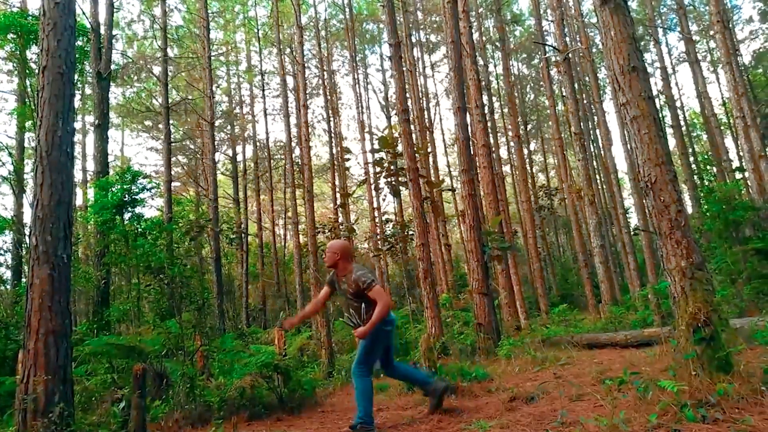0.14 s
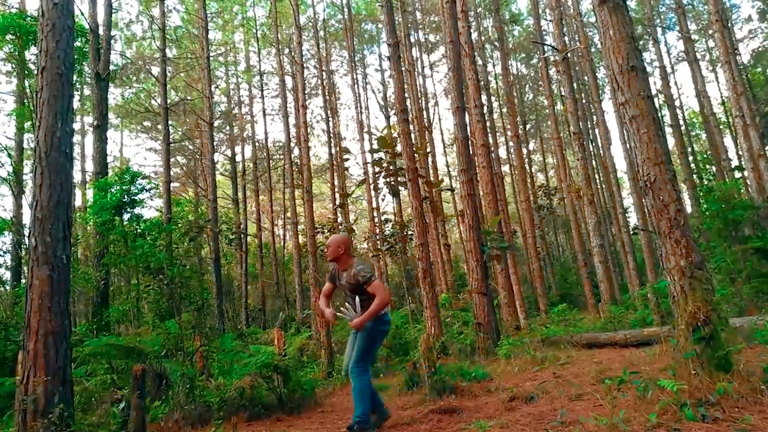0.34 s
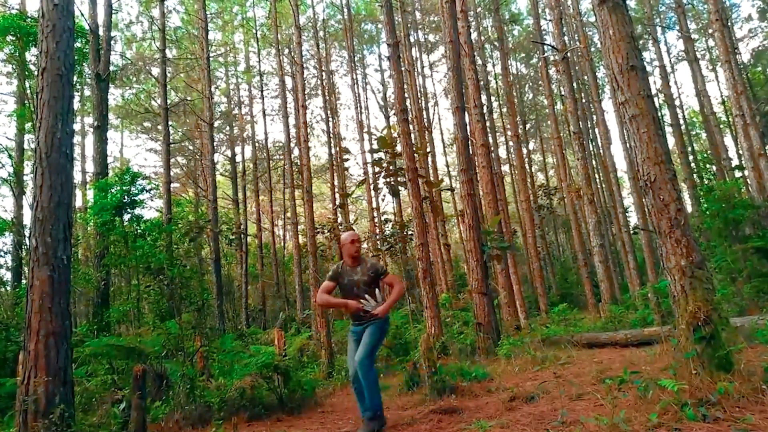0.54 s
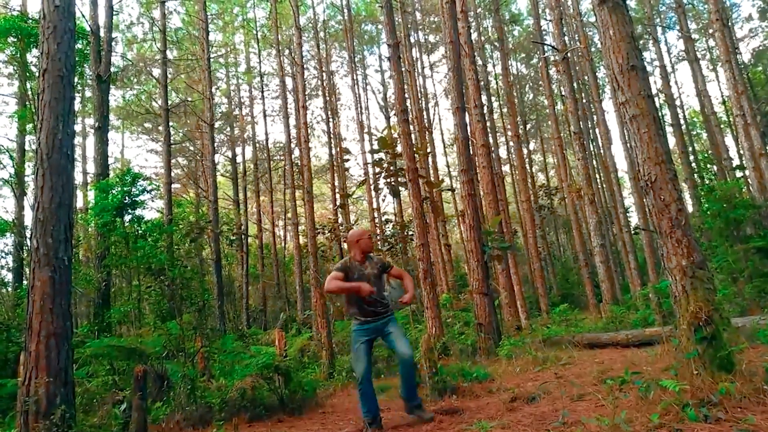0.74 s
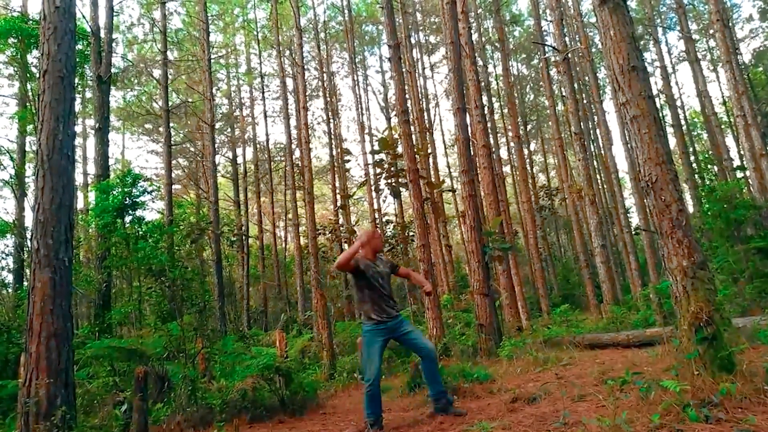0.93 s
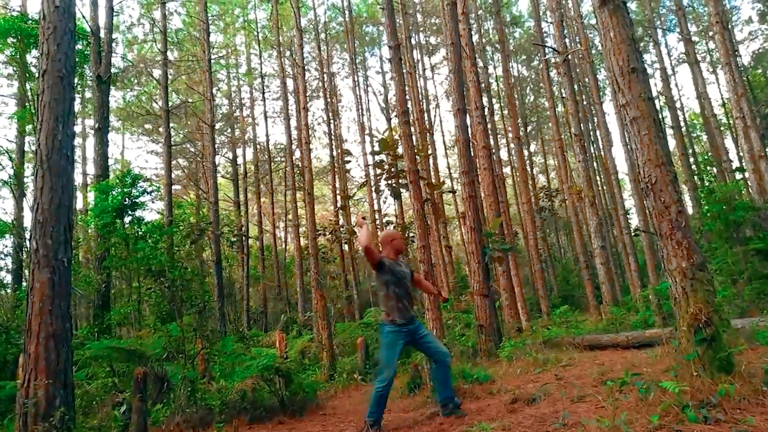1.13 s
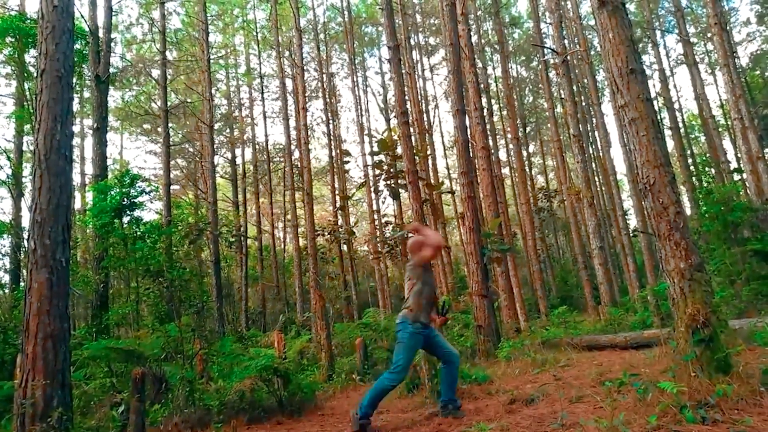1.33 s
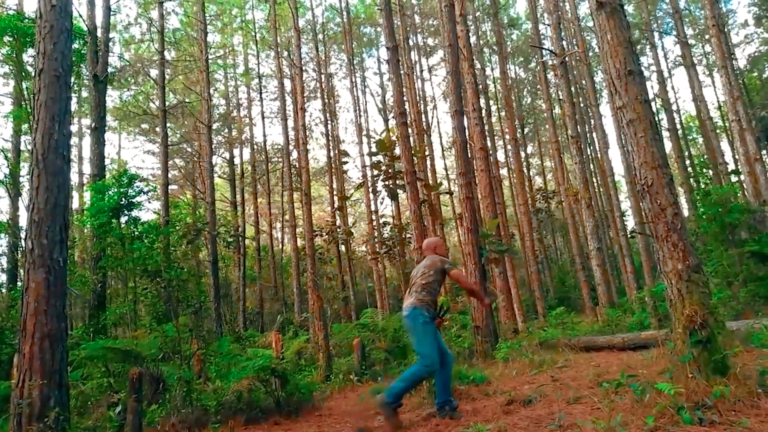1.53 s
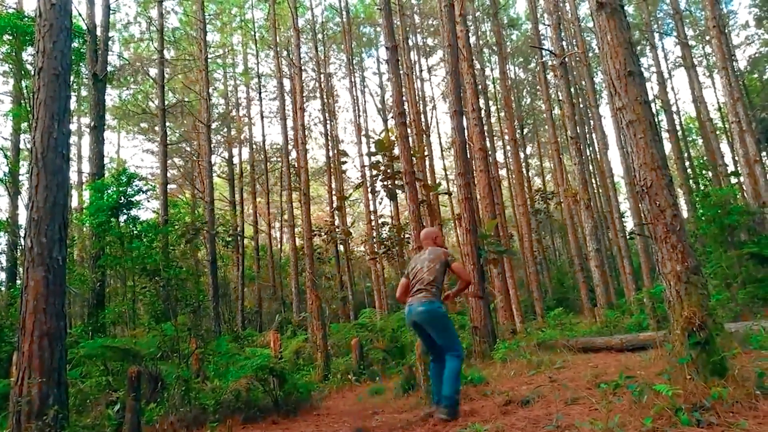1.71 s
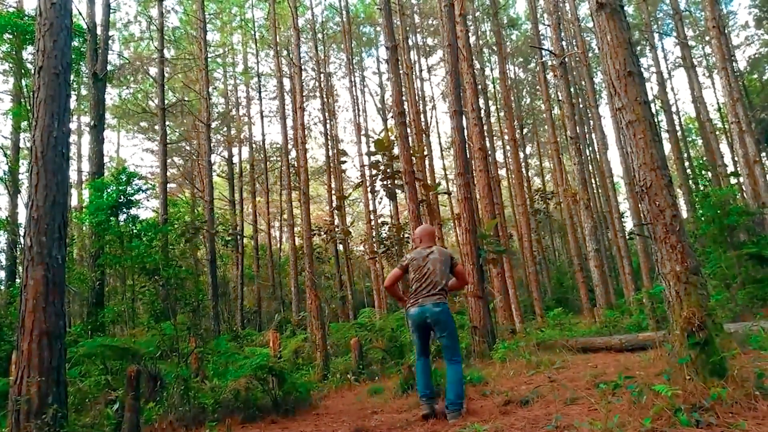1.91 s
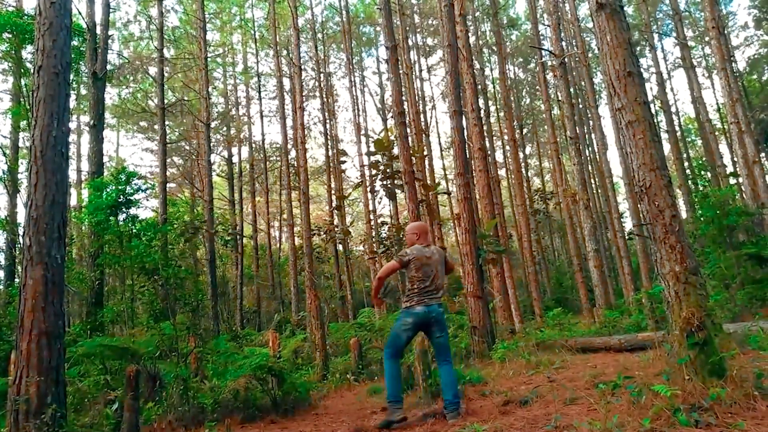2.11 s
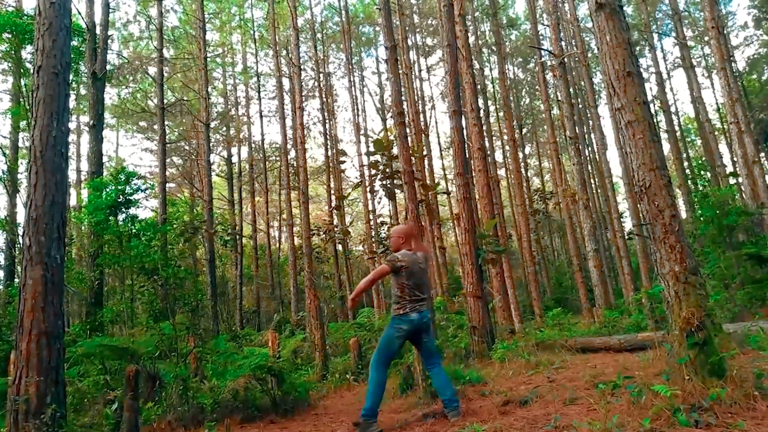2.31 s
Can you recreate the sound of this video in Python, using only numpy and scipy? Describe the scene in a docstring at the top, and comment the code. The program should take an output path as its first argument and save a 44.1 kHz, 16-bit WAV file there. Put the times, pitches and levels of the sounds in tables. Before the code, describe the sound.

Two throwing knives thunk hard into a wooden target, spare blades clinking between, in a quiet forest

```python
"""Two throwing knives slam into a wooden target close to the microphone and overload it: noise bursts for
crack and bite, damped modes for blade and wood. Pine trunks, ground and a diffuse tail scatter each blow back.
After each throw spare knives slide in the thrower's hand (grainy noise); after the first they also clink
(clicks and steel modes). Footsteps and swishes before the blows are crackly rustles over duller noise.
Behind it lie a low rumble and a thin hiss of insects, both slowly drifting noise."""
import sys
import numpy as np
from scipy import signal
from scipy.fft import rfft, irfft, next_fast_len
from scipy.io import wavfile
from scipy.ndimage import map_coordinates

SR = 44100
rng = np.random.default_rng(int(sys.argv[2]) if len(sys.argv) > 2 else 0)


def materialize(psi):
    """Save the field psi as 16-bit PCM at rate SR to the path in sys.argv[1].

    A 1-D psi becomes a single channel; in a 2-D psi each row is a channel.
    """
    bounded = np.clip(np.atleast_2d(psi).T, -1, 1)
    quanta = np.round(bounded * 32767).astype(np.int16)
    wavfile.write(sys.argv[1], SR, quanta)


N = 103635

# background spectra, relative: f/Hz, level/dB
RUMBLE_SPECTRUM = [(20, -35), (40, -15), (58, 0), (90, -1), (125, -8.5), (165, -18.5), (320, -20),
                   (600, -26.5), (1500, -34.5), (4000, -48)]
HISS_SPECTRUM = [(500, -21), (2000, -8), (5200, -11.5), (6300, -6.5), (7200, 1), (8300, -7), (8850, 4.5),
                 (9400, -11.5), (12000, -6), (13000, -25.5), (16000, -33)]
# rustles of feet and swishes: t/s, rustle level/dB, dull level/dB, dull f/Hz, rise/s, t60/s
RUSTLES = [(0.0, -50, -54, 447, 0.0017, 0.24), (0.115, -45, -51.5, 789.4, .012, 0.28),
           (0.148, -42.5, -53.5, 1390, .04, 0.27), (0.465, -61.5, -43, 414, 0.018, 0.098),
           (0.49, -46, -59.5, 427, 0.023, 0.13), (1.309, -57, -65.5, 407.4, 0.024, .25),
           (1.454, -46.5, -49.5, 940, .028, 0.23), (1.459, -50, -47.5, 2484, .025, .25),
           (1.51, -45, -51, 1264, 0.05, .2), (1.8, -39, -56, 512, 0.038, .2)]
# rustle spectrum, relative: f/Hz, level/dB
RUSTLE_SPECTRUM = [(200, -7), (700, -11.5), (2200, -7.5), (3300, -8), (7000, -4), (10000, -11.5),
                   (15500, -16.5)]
# spare knives rubbing: t/s, scrape level/dB, squeal level/dB, rise/s, t60/s
KNIFE_SLIDES = [(0.739, -28, -38.5, 0.01, 0.5), (0.77, -29.5, -36, .02, 0.083),
                (2.026, -55.5, -42, 0.0085, 0.208), (2.049, -55, -36.5, 0.006, 0.13)]
# spare knives clinking: t/s, level/dB
KNIFE_CLINKS = [(0.755, -25), (0.771, -23), (0.774, -22), (0.7908, -25), (0.794, -20), (0.811, -28.5)]
# scrape and click spectra, relative: f/Hz, level/dB
SCRAPE_SPECTRUM = [(500, -44), (1500, -21.5), (3300, -17), (4500, -7.5), (7200, 3.5), (9000, -6),
                   (12000, -12), (15500, -17)]
CLICK_SPECTRUM = [(700, -30.5), (1400, -19.5), (2300, 2), (3300, -20), (4300, -1), (7200, 2), (11500, -5),
                  (15500, -0.5)]
# loose blade modes before random spread: f/Hz, level/dB, t60/s
STEEL_MODES = [(2362, -9.5, .04), (4500, -15.5, .08), (5550, -11.5, 0.22), (5926, -5, 0.11),
               (6350, -13, 0.12), (6780, -5, 0.11), (7220, -3, 0.18), (8060, -8.5, .17), (8400, -6, 0.17),
               (10110, -7.5, 0.22), (10300, -12.5, 0.14), (11400, -14, 0.21), (13000, -4.5, .13)]
# forest decay: f/Hz, t60/s
FOREST_DECAY = [(100, .25), (220, .33), (500, 0.31), (1200, 0.75), (2400, 0.61), (6000, 0.57),
                (10000, 0.61), (15000, 0.45)]
# forest colour: f/Hz, gain/dB
FOREST_GAIN = [(60, -23), (130, -2), (220, 4.5), (380, 1), (700, -10), (1000, -10), (1300, -11.5),
               (1700, -7), (2300, -6), (2900, -8.5), (3800, -4.5), (5000, -8.5), (8000, -9.5),
               (11000, -12.5), (16000, -23)]
# knife strikes: t/s, crack level/dB, bite f/Hz, bite level/dB, wood level/dB, thud level/dB,
# blade f/Hz, blade level/dB, twin mode f/Hz, twin mode level/dB, blade t60/s, overtone f/Hz,
# overtone level/dB, slap delay/s, slap level/dB (re wood), left lead/ms (body only), forest level/dB
STRIKES = [(0.2058, 2.5, 6110, 2, 3, -9, 1212, 2.5, 1300, 1, 0.031, 2456, 3.5, 0.013, -21.5, 0.28, -8.5),
           (1.5516, -2, 5550, -5, -6.5, -9, 1025, -16.5, 1074, -20, .09, 2275, -7, .022, -7, -0.16, -2.5)]
# crack and slap grit spectra, relative: f/Hz, level/dB
CRACK_SPECTRUM = [(100, -15), (600, -13), (1500, 1), (3000, -3.5), (6500, -3.5), (9500, -8), (16000, -3)]
GRIT_SPECTRUM = [(500, -19), (2200, 1), (5800, -2), (9000, -19)]
# target's wood modes: f/Hz, level/dB, t60/s
WOOD_MODES = [(1370, -3.5, 0.0086), (2100, -9.5, 0.023), (2508, -7, 0.017), (3990, -4, 0.0099),
              (4320, -4.5, .007), (5450, -10, .006), (7680, -11, 0.02)]
# whole target flexing, before the radiation band: f/Hz, level/dB, t60/s
FLEX_MODES = [(165, -4.5, 0.0073), (218.5, -10.5, .1), (300, -2, 0.012), (378, -8.5, 0.017)]
# diffuse sound: f/Hz, left-right correlation/1
PORT_CORRELATION = [(60, .93), (250, .88), (450, 0.51), (800, 0.2), (1300, 0.41), (2500, -0.1)]
# port colour: f/Hz, left over right/dB
PORT_BALANCE = [(200, -1.5), (1200, 1), (2300, -7), (3200, -0.5), (5600, -8), (7200, -5), (8300, 3.5),
                (9500, 8), (11000, -4), (15000, 5)]

RUMBLE_DB, HISS_DB = -52.5, -58.5
SQUEAL_HZ, SQUEAL_WIDTH_RATIO, SQUEAL_GRAIN_DB = 7200, 1.5, 1
CLICK_T60_S, RING_DB, RING_SHIMMER, HAND_FOREST_DB = 0.029, -8, 0.7, -9.5
BASS_RETURN_S, BASS_HZ = 0.016, 434
NEAR_DB, NEAR_T60_S = 2.5, 0.08  # level re tail
TRUNK_DB, TRUNK_FADE_DB_PER_S = -12, 110  # level re tail
CRACK_T60_S, SPLINTER_DB, SPLINTER_T60_S = 0.0099, -24, 0.02  # splinter re crack
BITE_WIDTH_RATIO, BITE_T60_S = 1.59, 0.015
BLADE_DELAY_S, FLEX_RISE_S, OVERTONE_T60_S = 0.001, 0.00048, 0.014
THUD_DELAY_S, THUD_LOW_HZ, THUD_HIGH_HZ = 0.0013, 107, 430
SLAP_RISE_S, SLAP_T60_S, SLAP_GRIT_DB = 0.0026, 0.073, -10
CLIP_LEVEL, TOP_HZ = 1.0, 15950


def amp(db):
    """Decibels to gain."""
    return 10 ** (np.asarray(db) / 20)


def unit(x):
    """Scale to rms 1."""
    return x / np.sqrt(np.mean(x ** 2) + 1e-20)


def along(points, hz):
    """Interpolate (Hz, value) points on a log-frequency axis."""
    f, v = np.transpose(points)
    return np.interp(np.log(hz + 1), np.log(f + 1), v)


def filtered(x, response):
    """Apply a frequency response to x through the FFT."""
    m = next_fast_len(N + SR // 2)
    gain = response(np.fft.rfftfreq(m, 1 / SR))
    return irfft(rfft(x, m) * gain, m)[..., :N]


def wobble(knots_per_s):
    """Smooth random curve through normally distributed knots."""
    knots = rng.standard_normal(int(N * knots_per_s / SR) + 4)
    return map_coordinates(knots, [np.arange(N) * knots_per_s / SR])


def noise(spectrum):
    """Diffuse stereo noise of rms 1 whose left-right correlation depends on frequency."""
    def mid_side_gain(hz):
        angle = np.arccos(np.clip(along(PORT_CORRELATION, hz), -1, 1)) / 2
        return amp(along(spectrum, hz)) * [np.cos(angle), np.sin(angle)]

    mid, side = filtered(rng.standard_normal((2, N)), mid_side_gain)
    return unit(np.array([mid + side, mid - side]))


def band(hz, width):
    """Noise gathered round hz, 20 dB down at width times above and below it."""
    return noise([(hz / 8, -60), (hz / width, -20), (hz, 0), (hz * width, -20), (hz * 8, -60)])


def envelope(start_s, rise_s, t60_s):
    """Linear rise from start_s, then exponential fall."""
    t = np.arange(N) / SR - start_s
    fall = np.exp(-np.log(1000) * np.maximum(t - rise_s, 0) / t60_s)
    return np.clip(t / rise_s, 0, 1) * fall


def ring(modes, start_s, rise_s=0.00037):
    """Sum of damped sine modes struck at start_s."""
    t = np.arange(N) / SR - start_s
    return sum(amp(db) * envelope(start_s, rise_s, t60) * np.sin(2 * np.pi * hz * t)
               for hz, db, t60 in modes)


def background():
    """Low outdoor rumble and far insects: shaped noise, each drifting in level."""
    rumble = amp(RUMBLE_DB + 1.2 * wobble(2.6)) * noise(RUMBLE_SPECTRUM)
    hiss = amp(HISS_DB + 0.8 * wobble(5.3)) * noise(HISS_SPECTRUM)
    return rumble + hiss


def rustles():
    """Each row is a crackly rustle over a duller noise."""
    out = np.zeros((2, N))
    for start_s, rustle_db, dull_db, dull_hz, rise_s, t60_s in RUSTLES:
        rustle = unit(noise(RUSTLE_SPECTRUM) * amp(3.5 * wobble(500)))
        dull = noise([(dull_hz / 8, -40), (dull_hz / 2, -18), (dull_hz, 0),
                      (dull_hz * 2, -20), (dull_hz * 8, -60)])
        both = amp(rustle_db) * rustle + amp(dull_db) * dull
        out += envelope(start_s, rise_s, t60_s) * both
    return out


def diffuse_tail():
    """Noise decaying at a rate set by frequency; its bass builds up along a squared ramp."""
    hz, t, z = signal.stft(noise([(100, 0.016), (1000, 0)]), SR, nperseg=256)
    decay = np.exp(-np.log(1000) * t / along(FOREST_DECAY, hz)[:, None])
    tail = signal.istft(z * decay, SR, nperseg=256)[1][:, :N]
    bass = filtered(tail, lambda hz: 1 / (1 + (hz / BASS_HZ) ** 4))
    age_s = np.arange(N) / SR
    upper = (tail - bass) * np.clip(age_s / 0.017, 0, 1)
    bass = bass * np.clip(age_s / BASS_RETURN_S, 0, 1) ** 2
    return (upper + bass) * amp(0.94 * wobble(90))


def trunk_echoes(count):
    """Single trunk echoes at random delays, fading with delay and thinned in the bass."""
    echoes = np.zeros((2, N))
    delays_s = rng.uniform(0.017, 0.37, count)
    offsets_s = rng.uniform(-0.0002, 0.00048, count)
    for delay_s, offset_s, size in zip(delays_s, offsets_s, rng.normal(size=count)):
        gain = size * amp(-TRUNK_FADE_DB_PER_S * delay_s)
        echoes[0, int((delay_s + offset_s) * SR)] += gain
        echoes[1, int((delay_s - offset_s) * SR)] += gain
    return filtered(echoes, lambda hz: hz / (hz + 700))


def forest(x, trunk_count=50):
    """Convolve x with scatter from the ground nearby, trunk echoes and a diffuse tail."""
    tail = diffuse_tail()
    near = noise([(150, -25.5), (900, 3.5), (9000, -2)]) * envelope(0.0022, 0.003, NEAR_T60_S)
    trunks = trunk_echoes(trunk_count)
    answer = unit(tail) + amp(NEAR_DB) * unit(near) + amp(TRUNK_DB) * unit(trunks)
    answer = filtered(answer / np.sqrt(N), lambda hz: amp(along(FOREST_GAIN, hz)))
    return signal.fftconvolve(x, answer, axes=1)[:, :N]


def knife_slides():
    """Steel slides over steel: grainy scrape and a narrow squeal."""
    scrape = noise(SCRAPE_SPECTRUM) * amp(1.5 * wobble(400))
    squeal = unit(band(SQUEAL_HZ, SQUEAL_WIDTH_RATIO) * amp(SQUEAL_GRAIN_DB * wobble(300)))
    return sum((amp(scrape_db) * scrape + amp(squeal_db) * squeal) * envelope(start_s, rise_s, t60_s)
               for start_s, scrape_db, squeal_db, rise_s, t60_s in KNIFE_SLIDES)


def loose_blade_ring():
    """Clinks ring the loose blades at one port, unevenly because they touch."""
    out = np.zeros(N)
    for start_s, db in KNIFE_CLINKS:
        modes = [(hz * rng.normal(1, 0.00615), level_db + rng.normal(0, 1.8), t60_s)
                 for hz, level_db, t60_s in STEEL_MODES]
        out += amp(db + RING_DB) * ring(modes, start_s)
    return out * (1 + RING_SHIMMER * wobble(200))


def spare_knives():
    """Slides, clicks and blade rings, heard directly and by way of the forest."""
    clicks = noise(CLICK_SPECTRUM) * sum(amp(db) * envelope(start_s, 0.0005, CLICK_T60_S)
                                         for start_s, db in KNIFE_CLINKS)
    rings = np.array([loose_blade_ring() for port in range(2)])
    steel = knife_slides() + clicks + rings
    return steel + amp(HAND_FOREST_DB) * forest(steel)


def blow(start_s, crack_db, bite_hz, bite_db, wood_db, thud_db, blade_hz, blade_db, twin_hz, twin_db,
         blade_t60_s, over_hz, over_db, slap_delay_s, slap_db, lead_ms):
    """Point cracks and bites the wood, target flexes, stuck blade rings in close modes and slaps once."""
    splinter = amp(SPLINTER_DB) * envelope(start_s, 0.001, SPLINTER_T60_S)
    crack = noise(CRACK_SPECTRUM) * (envelope(start_s, 0.0004, CRACK_T60_S) + splinter)
    bite = band(bite_hz, BITE_WIDTH_RATIO) * envelope(start_s, 0.0007, BITE_T60_S)

    blade_modes = [(blade_hz, blade_db, blade_t60_s), (twin_hz, twin_db, blade_t60_s),
                   (over_hz, over_db, OVERTONE_T60_S)]
    blade = ring(blade_modes, start_s + BLADE_DELAY_S, FLEX_RISE_S)
    radiation = signal.butter(2, [THUD_LOW_HZ, THUD_HIGH_HZ], "bandpass", fs=SR, output="sos")
    thud = signal.sosfilt(radiation, ring(FLEX_MODES, start_s + THUD_DELAY_S, FLEX_RISE_S))

    slap_s = start_s + slap_delay_s
    grit = noise(GRIT_SPECTRUM) * envelope(slap_s, SLAP_RISE_S, SLAP_T60_S)
    slap = ring(WOOD_MODES, slap_s, SLAP_RISE_S) + amp(SLAP_GRIT_DB) * grit
    wood = ring(WOOD_MODES, start_s) + amp(slap_db) * slap

    body = blade + amp(thud_db) * thud + amp(wood_db) * wood
    # half the lead advances the left port, half delays the right
    half_lead_s = lead_ms / 1000 / 2 * np.array([[1], [-1]])
    body = filtered(body, lambda hz: np.exp(2j * np.pi * hz * half_lead_s))
    return amp(crack_db) * crack + amp(bite_db) * bite + body


def throws(directions=3):
    """Each blow arrives directly and via the forest from several directions, a little different in each."""
    out = np.zeros((2, N))
    for *strike, forest_db in STRIKES:
        direct = blow(*strike)
        scattered = sum(forest(blow(*strike)) for direction in range(directions))
        out += direct + amp(forest_db) * scattered / np.sqrt(directions)
    return out


def scene():
    """All sources at the two microphone ports."""
    return background() + rustles() + spare_knives() + throws()


def record(dry):
    """Colour each port, clip what exceeds the limit, then cut everything from TOP_HZ up."""
    x = filtered(dry, lambda hz: amp(along(PORT_BALANCE, hz) * np.array([[0.5], [-0.5]])))
    return filtered(np.clip(x, -CLIP_LEVEL, CLIP_LEVEL), lambda hz: hz < TOP_HZ)


dry = scene()
out = record(dry)
materialize(out)
```